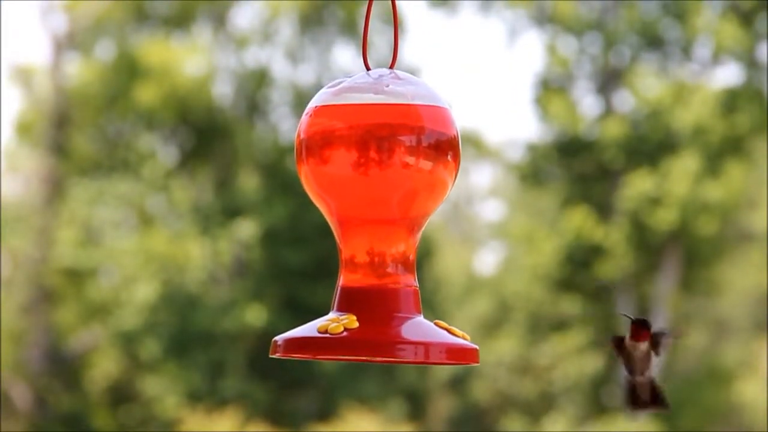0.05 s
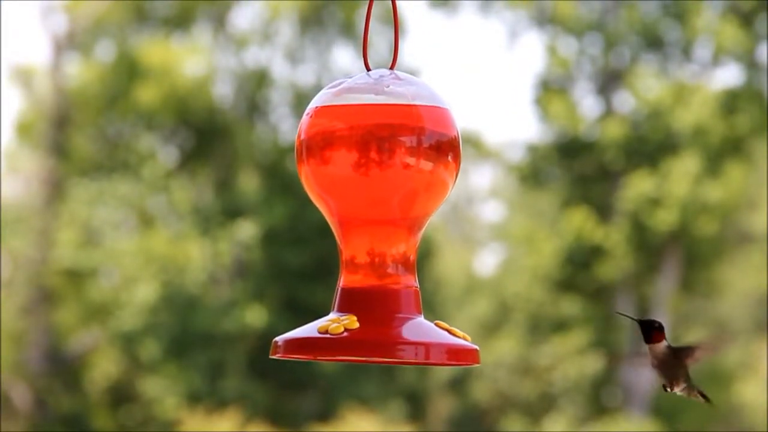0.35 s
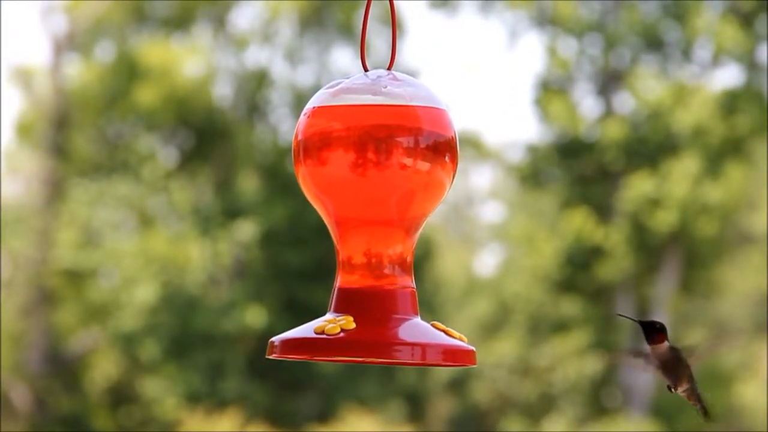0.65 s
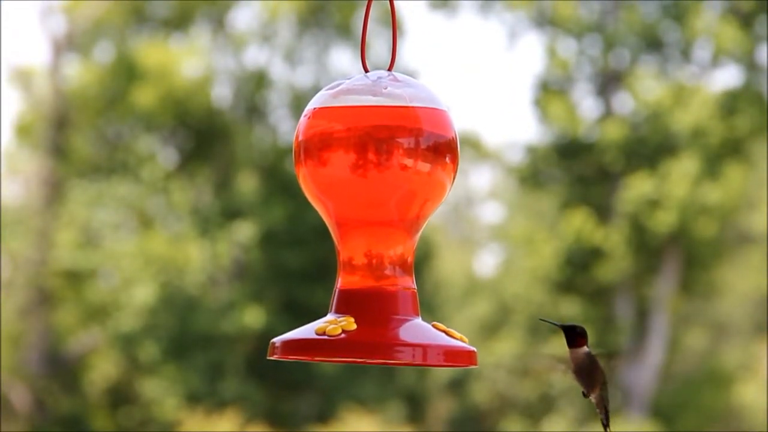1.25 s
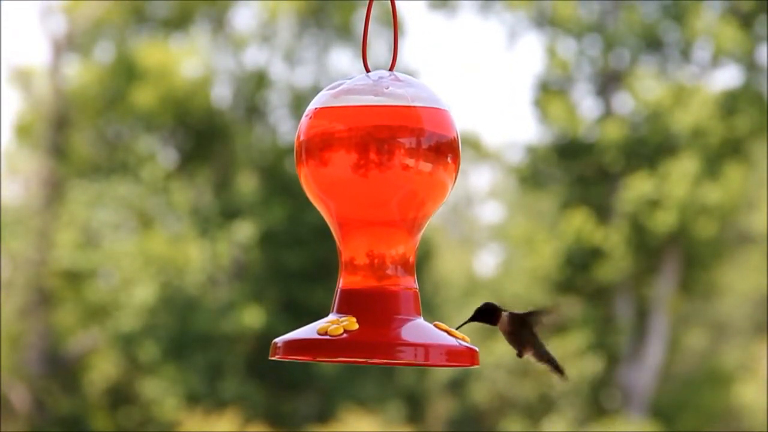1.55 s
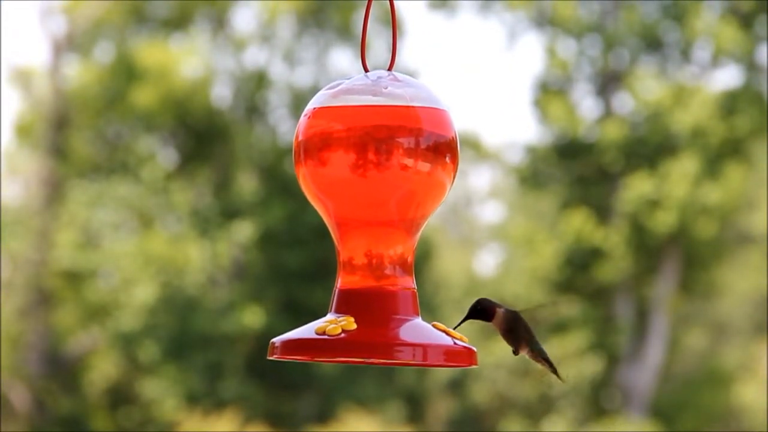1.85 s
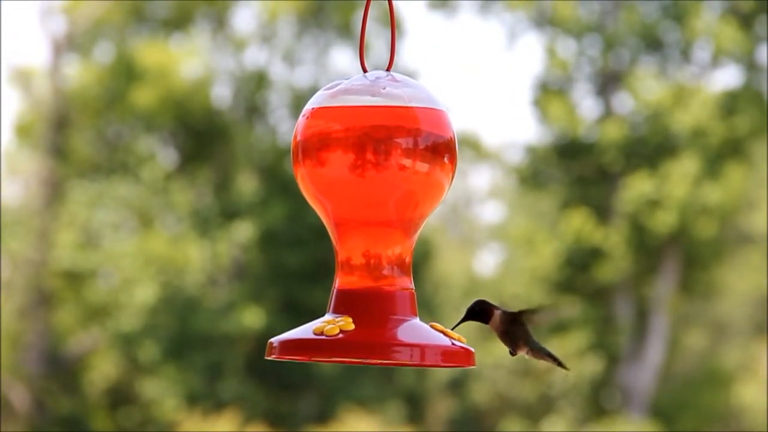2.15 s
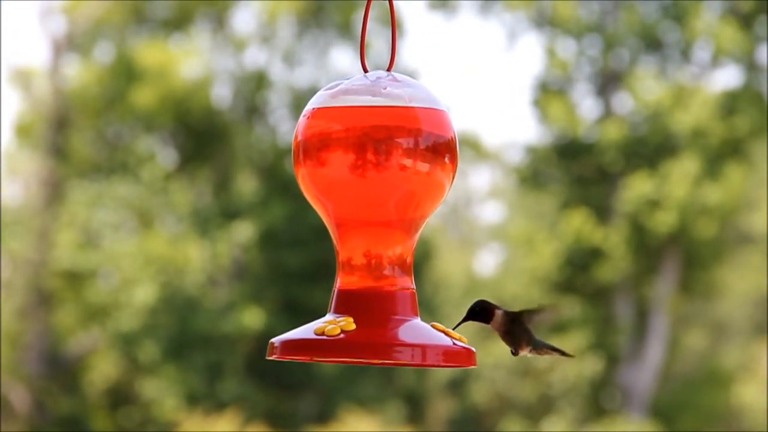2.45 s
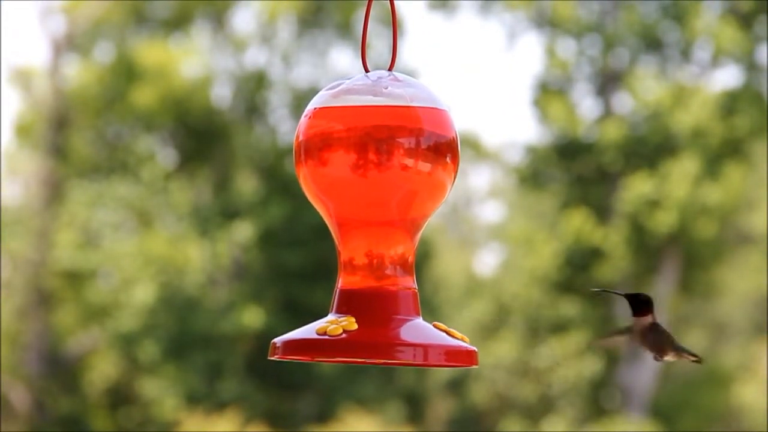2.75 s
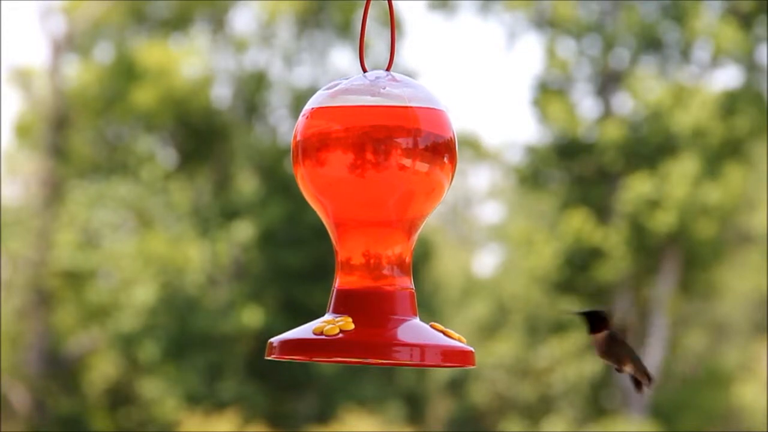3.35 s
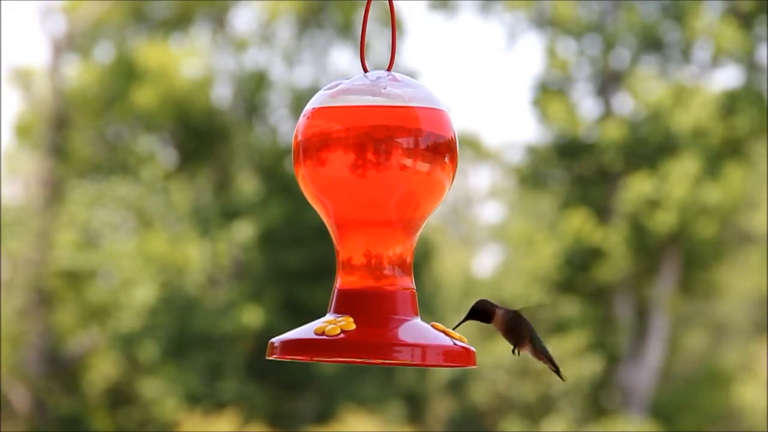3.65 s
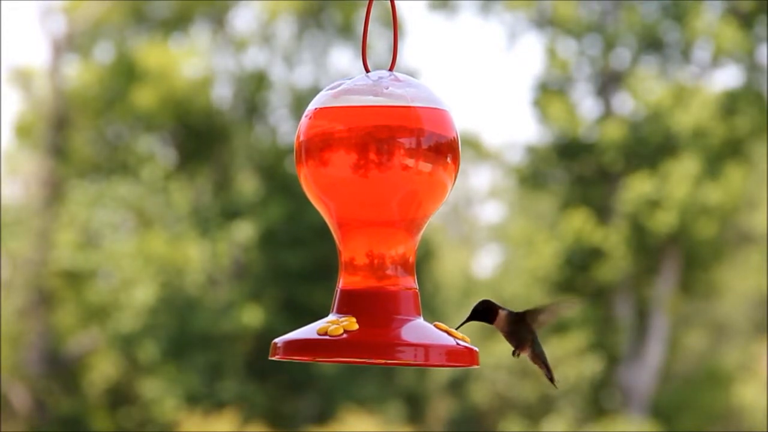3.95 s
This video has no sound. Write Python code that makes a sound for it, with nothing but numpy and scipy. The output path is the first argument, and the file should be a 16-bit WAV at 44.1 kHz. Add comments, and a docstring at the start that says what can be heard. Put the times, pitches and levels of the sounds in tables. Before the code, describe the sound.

A steady far cicada drone and outdoor hiss, broken by three short hummingbird chirps.

```python
"""A far drone near 1.1 kHz, most likely periodical cicadas, under a wide hiss and a faint machine hum.
Songbirds whistle in the trees; a nearer insect buzz swells twice.
In front, a hummingbird hovers at a garden feeder. Its wingbeats make a soft harmonic hum,
and it gives three sharp chips: falling harmonic stacks, two of them breaking into a rasp."""
import sys
import numpy as np
from scipy import signal
from scipy.fft import rfft, irfft
from scipy.io import wavfile
from scipy.ndimage import uniform_filter1d

SR = 44100
rng = np.random.default_rng(int(sys.argv[2]) if len(sys.argv) > 2 else 0)


def generate_wav(sig):
    """Save sig (samples, or channels by samples) to the path in sys.argv[1] as 16-bit PCM at SR."""
    pcm = np.round(np.clip(np.atleast_2d(sig).T, -1, 1) * 32767).astype(np.int16)
    wavfile.write(sys.argv[1], SR, pcm)


N = 176400

# machine hum partials (frequency [Hz], level [dB])
HUM_PARTIALS = [(60, -74), (120, -66.5)]
# air and far insects (frequency [Hz], relative density [dB])
AIR_SPECTRUM = [(20, -26), (40, -19), (60, -3.5), (200, 0), (450, -1.5), (700, 3), (1700, -2), (2800, -8),
                (3450, -4.5), (3900, -1), (4400, -1), (4800, -4), (5800, 0), (6800, -3.5), (8000, -2.5),
                (9500, -14), (11500, -24), (13500, -28), (15500, -32)]
# slow drift of the hiss treble (time [s], gain [dB])
TREBLE_GAIN = [(0, -0.5), (.7, 0), (1.6, -0.26), (2.6, 0.3), (3.3, 0.5), (3.55, 0.4), (4, 0.2)]
# cicada chorus (frequency [Hz], relative density [dB])
CHORUS_SPECTRUM = [(450, -45), (640, -33.5), (715, -25), (820, -24.5), (940, -12), (1010, -9), (1060, -1.5),
                   (1095, -1.3), (1140, -5), (1175, -12.5), (1215, -14.5), (1255, -15), (1320, -22.5),
                   (1450, -27), (1900, -56)]
# chorus envelope (time [s], level [dB])
CHORUS_LEVEL = [(0, -33), (.5, -32.5), (.85, -31), (1.1, -32.5), (1.4, -30.5), (1.75, -32.5), (2.2, -31.5),
                (2.55, -31.5), (2.88, -33.5), (3.05, -31), (3.3, -33), (3.55, -30.5), (3.8, -30.5),
                (4, -31)]
# nearer insect (frequency [Hz], relative density [dB])
BUZZ_SPECTRUM = [(4000, -26), (4800, -4), (5150, 5), (5450, 0), (5900, 4.5), (6250, -6), (6650, 1),
                 (7300, -42)]
# buzz swells (centre time [s], half length [s], peak level [dB])
BUZZ_SWELLS = [(2.21, 0.29, -46.5), (3.02, 0.16, -49)]
# ringing note in the buzz (time [s], level [dB])
RING_LEVEL = [(1.7, -100), (1.78, -52), (2.05, -56), (2.3, -58), (2.43, -54), (2.55, -100)]
# songbird notes (time [s], length [s], start pitch [Hz], end pitch [Hz], level [dB], blur [0-1])
SONGBIRD_NOTES = [(.10, .075, 6800, 6800, -54, .25), (.185, 0.07, 6830, 6840, -59, .25),
                  (0.301, .08, 4520, 4460, -63, .2), (0.368, 0.15, 4330, 4310, -57.5, 0.1),
                  (0.461, .06, 4264, 4310, -51.5, 0.3), (.6, 0.13, 6260, 6260, -55, .3),
                  (0.731, 0.13, 6230, 6200, -63, .2), (0.917, 0.045, 3850, 3800, -51, .3),
                  (.99, .065, 3860, 3800, -53, 0.1), (1.339, 0.048, 3090, 2760, -55.5, 0.8),
                  (1.57, .11, 2340, 2870, -57.5, 0.8), (1.68, 0.085, 2950, 3240, -57.5, .7),
                  (2.32, 0.041, 2300, 1980, -54.5, 0.6), (2.42, 0.074, 2280, 2650, -59, .9),
                  (2.539, 0.052, 2780, 2800, -59, 0.2), (2.625, 0.045, 2310, 2050, -54.5, .8),
                  (2.998, .03, 2340, 2150, -57, .6), (3.698, 0.072, 2850, 2700, -60, .8),
                  (3.766, 0.045, 2390, 1990, -50, 0.5), (3.826, 0.07, 3020, 2760, -48.5, 0.3),
                  (3.961, 0.06, 2770, 2760, -55, 0.3), (0, 0.16, 3150, 2750, -60, 0.94),
                  (0.187, 0.053, 2950, 2900, -63, 1), (0.267, 0.064, 2700, 2010, -56, 0.9),
                  (0.569, 0.074, 2250, 2350, -58, .8), (.58, .09, 11200, 12150, -75, .8),
                  (.67, .08, 12150, 11100, -71, .8)]
# hummingbird wingbeat (time [s], rate [Hz], level [dB])
WINGBEAT = [(0, 59.7, -56.5), (.5, 55.5, -56), (.68, 62, -64), (.9, 58, -60.5), (1.2, 55, -57.5),
            (1.45, 56, -69), (1.85, 58.5, -61.5), (2.4, 53, -61.5), (2.7, 59, -62), (3.1, 60, -63),
            (3.4, 56.5, -64), (4, 66, -88)]
# wingbeat harmonics (order [-], relative level [dB])
WING_HARMONICS = [(1, -7), (2, -17), (3, -9), (4, 5.5), (5, -15), (6, -4)]
# hummingbird chips (time [s], length [s], rise [s], start pitch [Hz], end pitch [Hz], level [dB],
# roughness [0-1], tilt [dB/harmonic])
CHIP_CALLS = [(0.942, 0.025, .006, 1856, 1348, -32.5, 0.6, 1.95),
              (1.467, 0.02, 0.0037, 1870, 1320, -34.5, 0.08, -0.5),
              (3.173, .019, .002, 1756, 1273, -34.5, 0.7, 0.1)]
# voiced part of a chip (frequency [Hz], relative level [dB])
CHIP_SPECTRUM = [(1400, -6), (1750, 7), (2200, 9), (2900, 4), (3400, -2), (4000, 0.5), (5000, 1.5),
                 (6500, -6.5), (8000, -2.5), (9600, -4), (11500, -32), (13500, -28), (15500, -33)]
# noisy part of a chip (frequency [Hz], relative density [dB])
RASP_SPECTRUM = [(1200, -7), (2200, -15.5), (2900, -9), (5200, 5), (6500, 1.5), (8000, -15.5), (9800, -4.5),
                 (11500, -31), (14000, -22), (15500, -27)]


def amp(db):
    """Decibels to gain."""
    return 10 ** (np.asarray(db) / 20)


def unit(x):
    """Scale to rms 1."""
    return x / np.sqrt(np.mean(x ** 2) + 1e-20)


def db_at(spectrum, hz):
    """Interpolate a spectrum on a log-frequency axis."""
    points_hz, db = np.transpose(spectrum)
    return np.interp(np.log(hz + 1), np.log(points_hz + 1), db)


def curves(rows):
    """Each value column of a time table, per sample."""
    times_s, *columns = np.transpose(rows)
    return [np.interp(np.arange(N) / SR, times_s, column) for column in columns]


def add(mix, start_s, sound):
    """Mix a sound in at start_s."""
    part = mix[round(start_s * SR):][:len(sound)]
    part += sound[:len(part)]


def noise(spectrum):
    """Shaped noise, rms 1."""
    gain = amp(db_at(spectrum, np.fft.rfftfreq(N, 1 / SR)))
    return unit(irfft(rfft(rng.standard_normal(N)) * gain, N))


def wander(rate_hz, n=N):
    """Smooth random motion up to about rate_hz."""
    gain = np.exp(-(np.fft.rfftfreq(N, 1 / SR) / rate_hz) ** 2)
    return unit(irfft(rfft(rng.standard_normal(N)) * gain, N))[:n]


def tone(hz, blur, blur_hz=130):
    """Tone on a pitch curve; blur is the power share smeared into narrow noise."""
    phase = 2 * np.pi * np.cumsum(hz) / SR
    smear = wander(blur_hz, len(hz)) * np.sin(phase) + wander(blur_hz, len(hz)) * np.cos(phase)
    return unit(np.sqrt(1 - blur) * np.sin(phase) + np.sqrt(blur / 2) * smear)


def echoes(x, t60_s, wet_db):
    """Scattered reflections from house and trees, starting after 5 ms."""
    t = np.arange(SR) / SR
    taps = rng.standard_normal(SR) * (rng.random(SR) < 0.05)
    taps *= amp(-60 * t / t60_s) * (t > 0.005)
    return amp(wet_db) * signal.fftconvolve(x, taps / np.linalg.norm(taps))[:N]


def machine_hum():
    """Faint hum of a far machine, with slight phase jitter."""
    t = np.arange(N) / SR
    return sum(amp(db) * unit(np.sin(2 * np.pi * hz * t + 0.13 * wander(4.9))) for hz, db in HUM_PARTIALS)


def air(level_db=-44, patch_db=0.7, flicker_db=0.52, swell_db=0.36, treble_from_hz=3700):
    """Outdoor wash and insect hiss in drifting patches; the treble slowly swells and sinks."""
    hz, t, bins = signal.stft(noise(AIR_SPECTRUM), SR, nperseg=512)
    patches = uniform_filter1d(rng.standard_normal(bins.shape), size=7, axis=0)
    patches = unit(uniform_filter1d(patches, size=16, axis=1))
    treble_db = np.outer(hz > treble_from_hz, np.interp(t, *np.transpose(TREBLE_GAIN)))
    wash = signal.istft(bins * amp(patch_db * patches + treble_db), nperseg=512)[1][:N]
    return wash * amp(level_db + flicker_db * wander(35) + swell_db * wander(10))


def cicada_chorus(centre_hz=1088.6, waver_hz=31.97, centre_db=-6):
    """Countless far cicadas on nearly one pitch merge into a drone with a firmer, wavering centre."""
    level_db, = curves(CHORUS_LEVEL)
    centre = tone(centre_hz + waver_hz * wander(12.99), blur=0)
    return amp(level_db) * unit(noise(CHORUS_SPECTRUM) + amp(centre_db) * centre)


def insect_buzz(ring_hz=5260):
    """A nearer insect swells twice; a thin ringing note leads into the first swell."""
    t = np.arange(N) / SR
    swells = sum(amp(db) * np.exp(-abs((t - mid_s) / half_s) ** 3) for mid_s, half_s, db in BUZZ_SWELLS)
    ring_db, = curves(RING_LEVEL)
    return swells * noise(BUZZ_SPECTRUM) + amp(ring_db) * tone(np.full(N, ring_hz), blur=0.75)


def songbird_whistle(length_s, start_hz, end_hz, level_db, blur):
    """One far note, blurred on its way through the trees."""
    progress = np.arange(0, length_s, 1 / SR) / length_s
    envelope = np.sqrt(abs(np.sin(np.pi * progress)))
    return amp(level_db) * unit(envelope * tone(start_hz + (end_hz - start_hz) * progress, blur))


def hummingbird_wings(rate_jitter=0.01, flutter_db=2):
    """Wingbeat harmonics; rate and level shift as the bird darts."""
    beat_hz, level_db = curves(WINGBEAT)
    phase = 2 * np.pi * np.cumsum(beat_hz * (1 + rate_jitter * wander(34))) / SR
    gain = amp(level_db + flutter_db * wander(15))
    harmonics = [amp(db) * np.cos(k * phase + 2 * np.pi * rng.random()) for k, db in WING_HARMONICS]
    return gain * unit(sum(harmonics))


def hummingbird_chip(length_s, rise_s, start_hz, end_hz, level_db, roughness, tilt_db):
    """Flickering harmonics drop in pitch; roughness sets how far they break into a rasp."""
    break_s, fall_s, flicker_db = 0.011, 0.0031, 4.5
    t = np.arange(0, length_s, 1 / SR)
    n = len(t)
    rasp_share = roughness * np.minimum(t / break_s, 1)
    hz = start_hz + (end_hz - start_hz) * t / length_s
    pitch_jitter = 0.094 * rasp_share * wander(910, n)
    phase = 2 * np.pi * np.cumsum(hz * (1 + pitch_jitter)) / SR
    voiced = np.zeros(n)
    for k in range(1, 12):
        harmonic_db = db_at(CHIP_SPECTRUM, k * hz) + tilt_db * k + flicker_db * wander(280, n)
        voiced += amp(harmonic_db) * np.sin(k * phase)
    call = np.sqrt(1 - rasp_share) * unit(voiced) + np.sqrt(rasp_share) * noise(RASP_SPECTRUM)[:n]
    envelope = np.minimum(t / rise_s, 1) * np.minimum((length_s - t) / fall_s, 1)
    return amp(level_db) * envelope * call


def scene():
    """Near hummingbird and far songbirds over the insect chorus, mono."""
    bounce_s, bounce_db = 0.001464, -17  # reflection off a close surface
    bed = air() + cicada_chorus() + insect_buzz() + hummingbird_wings() + machine_hum()
    chips, whistles = np.zeros(N), np.zeros(N)
    for start_s, *call in CHIP_CALLS:
        chip = hummingbird_chip(*call)
        add(chips, start_s, chip)
        add(chips, start_s + bounce_s, amp(bounce_db) * chip)
    for start_s, *note in SONGBIRD_NOTES:
        add(whistles, start_s, songbird_whistle(*note))
    chips += echoes(chips, t60_s=0.23, wet_db=-7.5)
    whistles += echoes(whistles, t60_s=1.0, wet_db=-6)
    return (bed + whistles + chips)[None]


def record(dry):
    """Low-pass at 15.7 kHz."""
    lowpass = signal.firwin(511, 15700, window=("kaiser", 9), fs=SR)
    return signal.oaconvolve(dry, lowpass[None], "same")


dry = scene()
out = record(dry)
generate_wav(out)
```